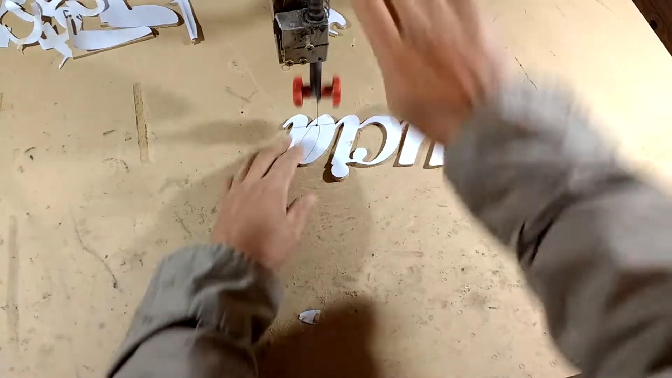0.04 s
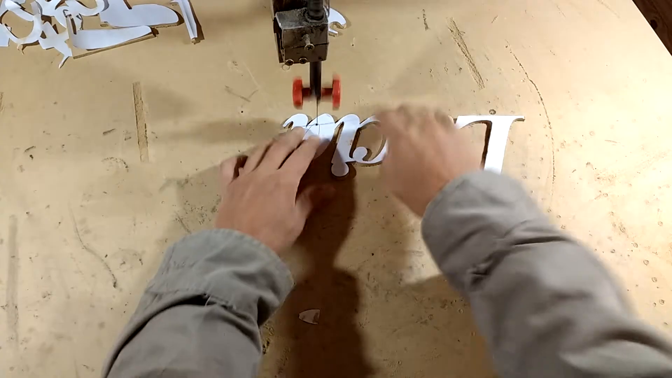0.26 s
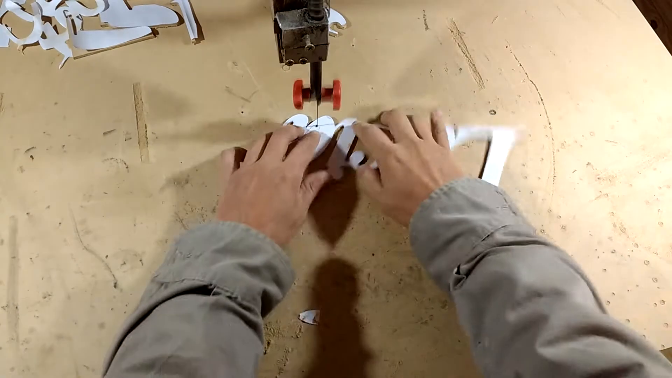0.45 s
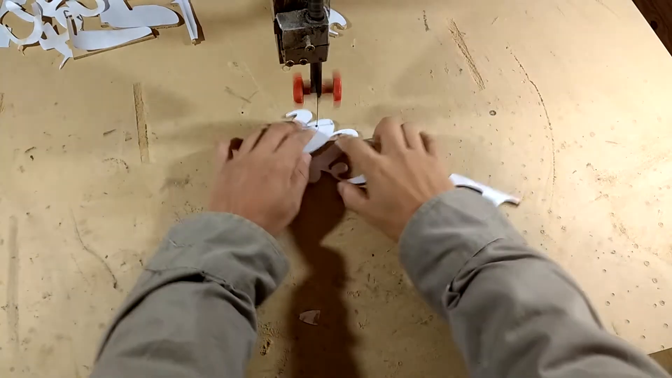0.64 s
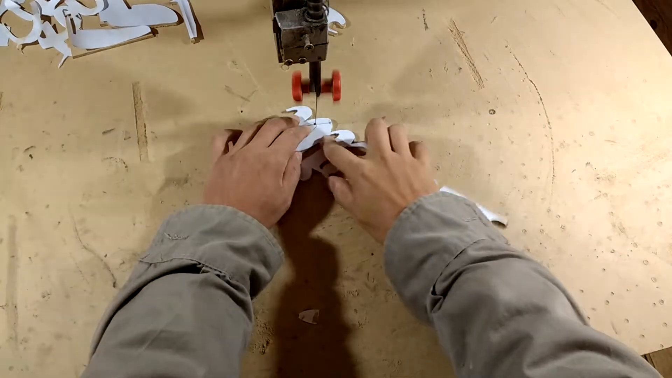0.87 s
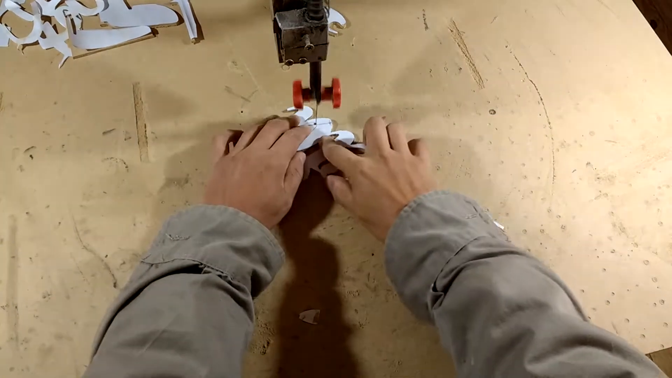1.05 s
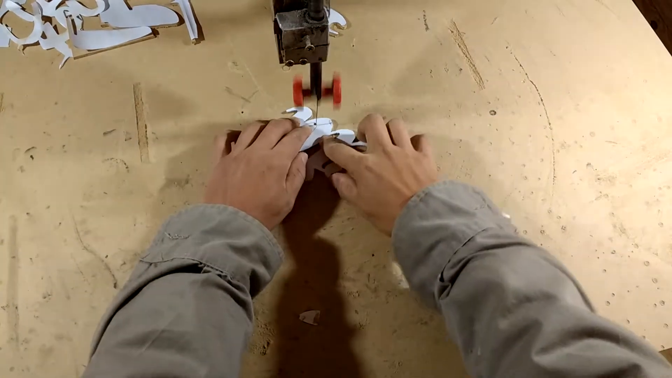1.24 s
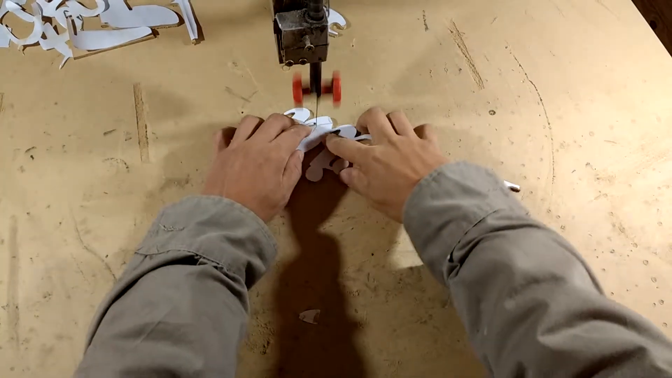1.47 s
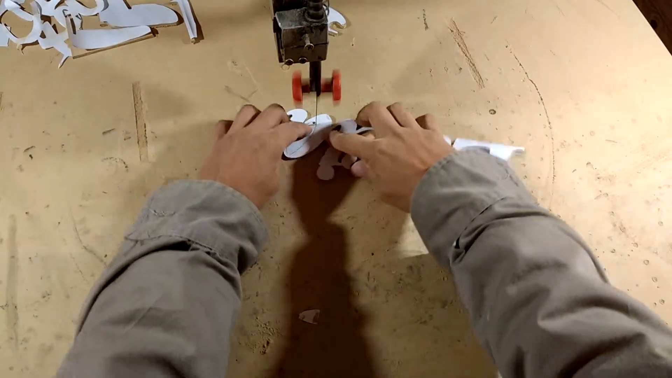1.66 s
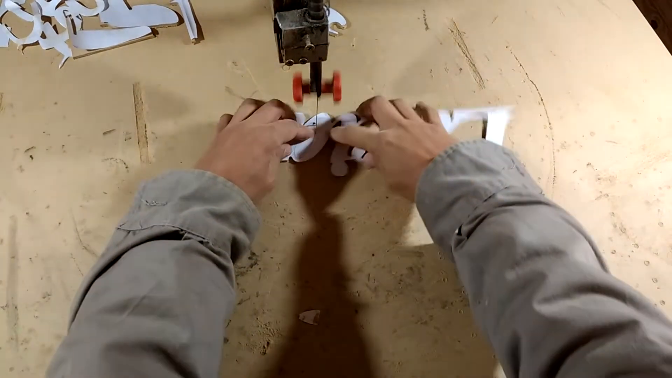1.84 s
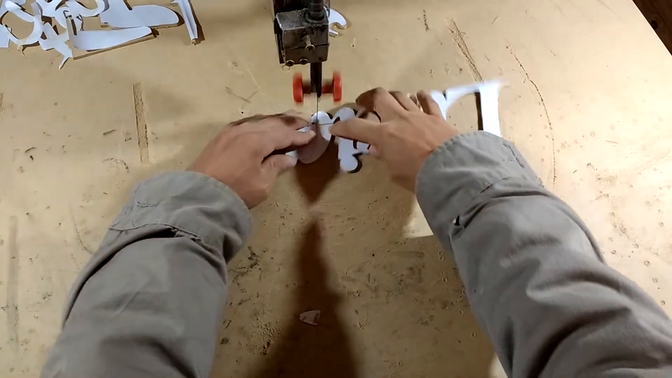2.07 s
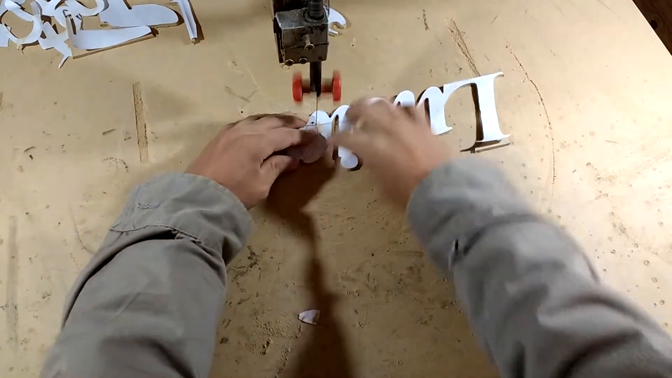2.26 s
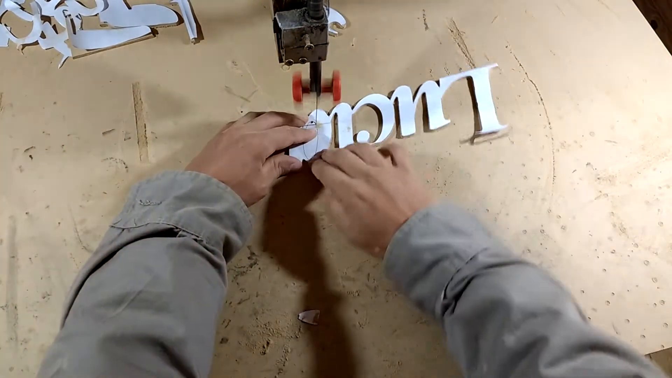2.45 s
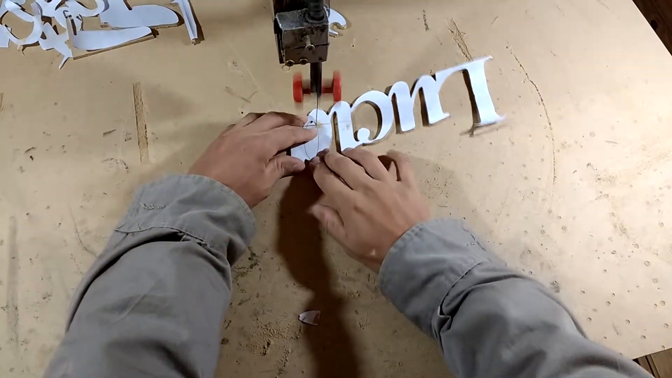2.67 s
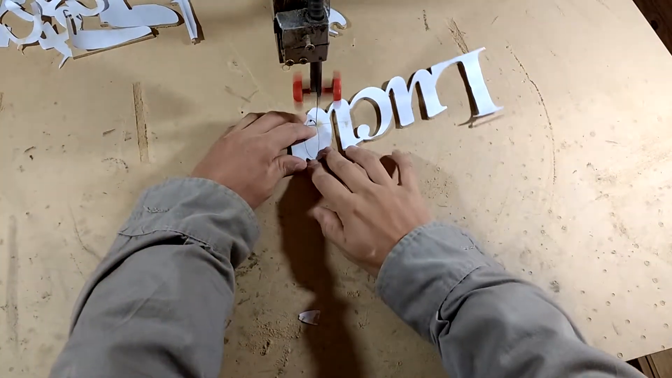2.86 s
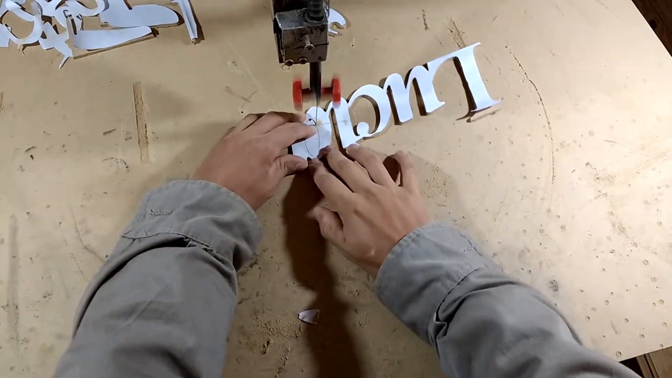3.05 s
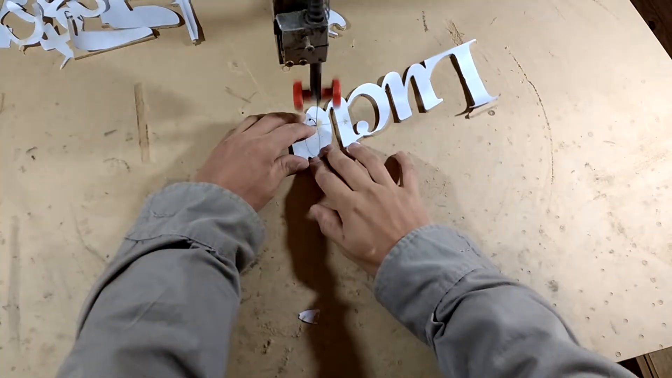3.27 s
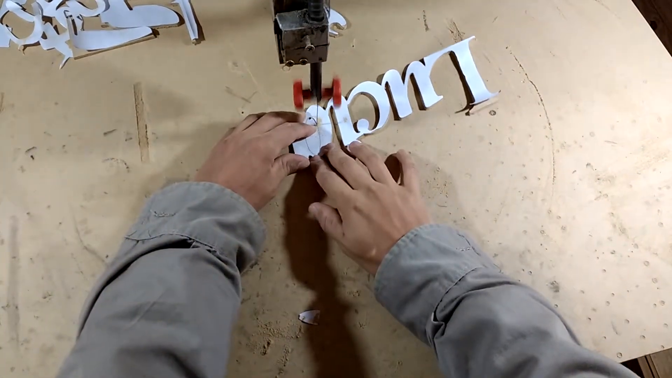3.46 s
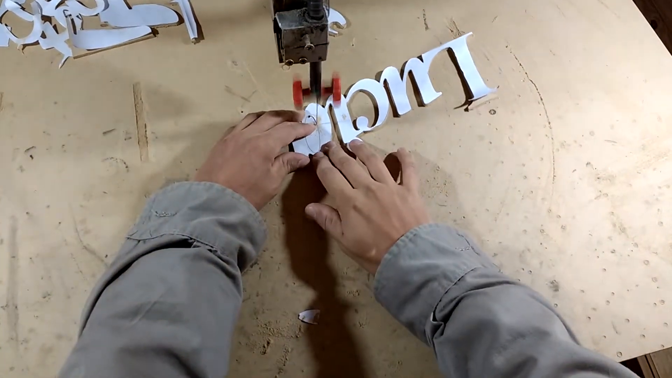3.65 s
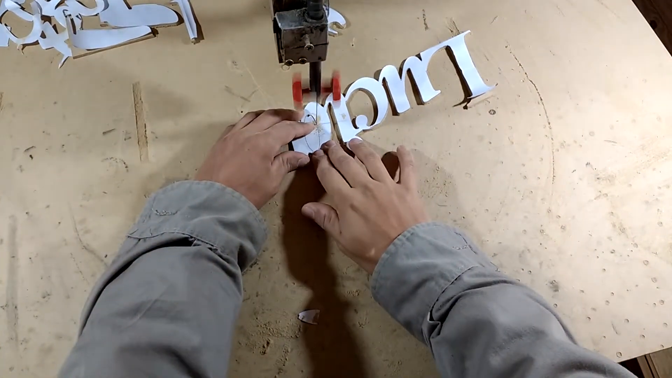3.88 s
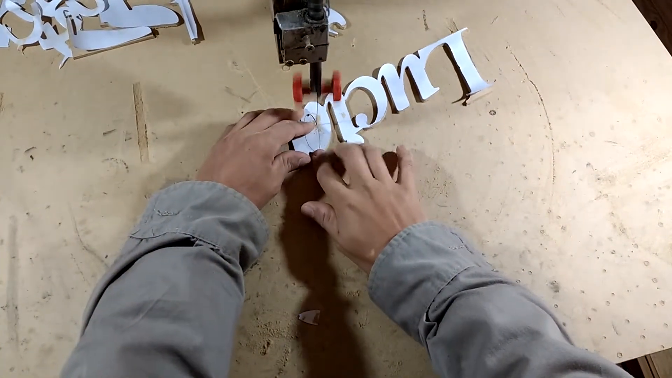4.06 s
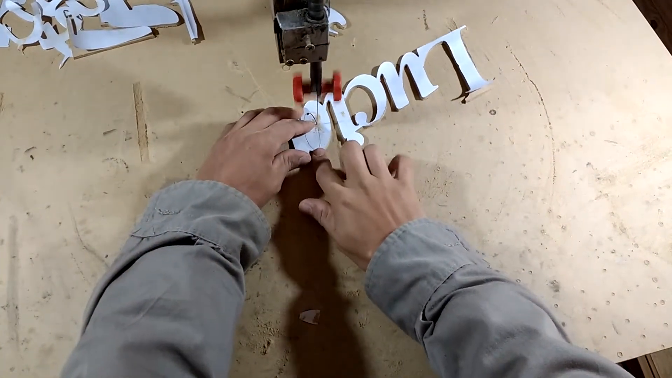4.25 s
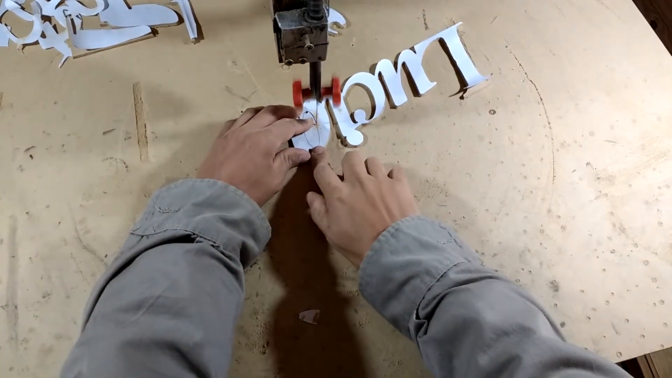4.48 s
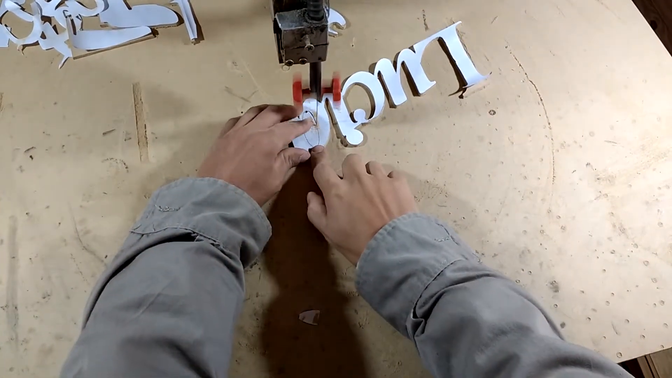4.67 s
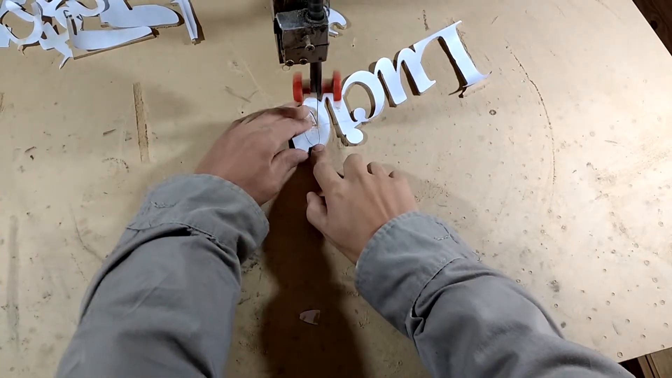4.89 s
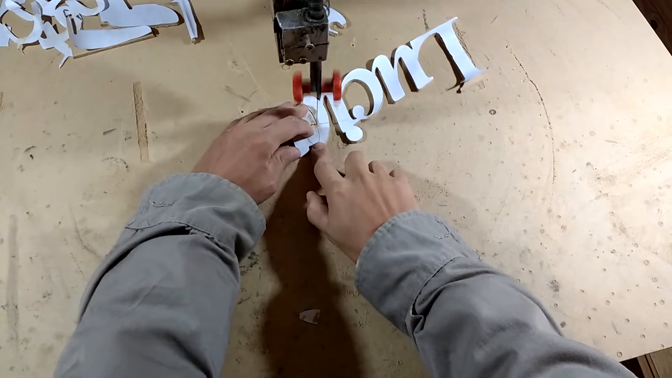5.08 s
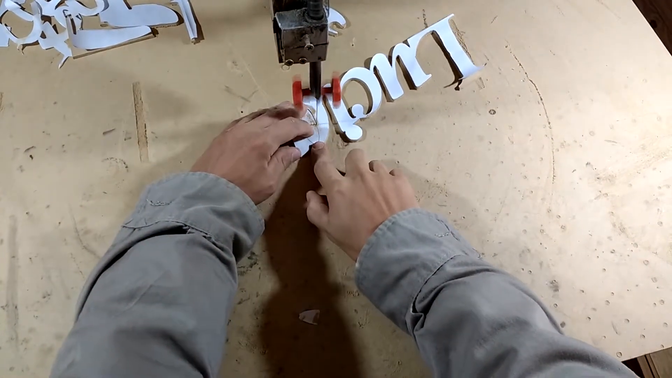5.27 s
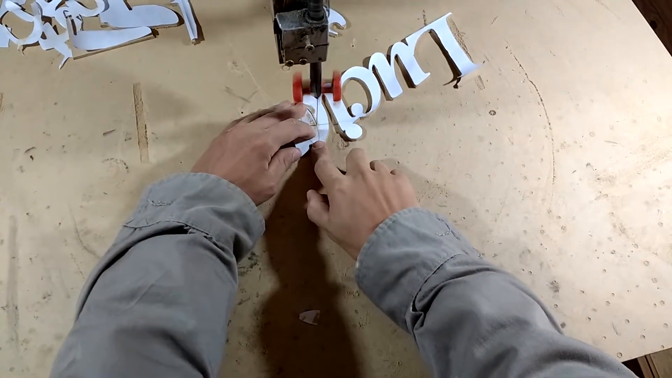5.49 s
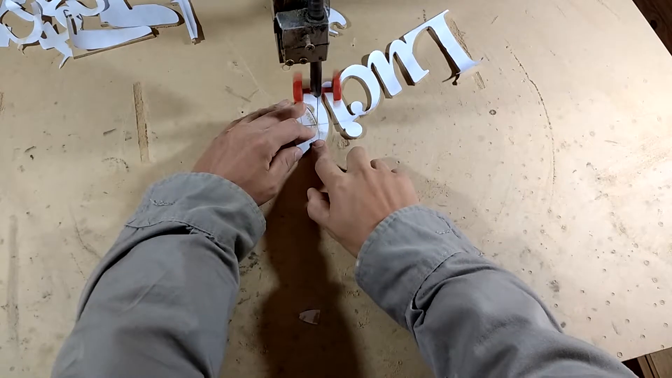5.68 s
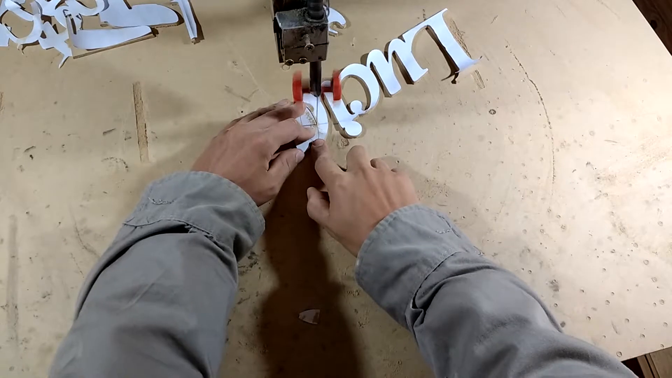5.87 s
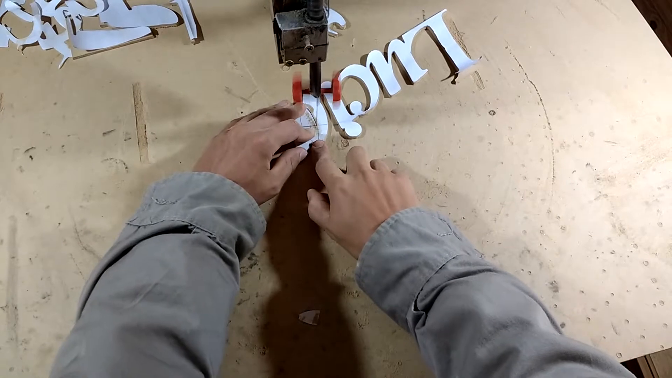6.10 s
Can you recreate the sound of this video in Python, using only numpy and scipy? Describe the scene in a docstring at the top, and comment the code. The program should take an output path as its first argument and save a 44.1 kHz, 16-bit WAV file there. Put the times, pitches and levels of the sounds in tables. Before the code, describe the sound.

A bench-mounted electric scroll saw starts quietly, with faint motor hum, loose knocks, light ticks of the workpiece and thin blade squeaks. Within a second it speeds up to a loud, rapid clatter of nearly fifteen strokes a second, then runs steadily. Metal arm ring, hollow table boom, low hum and loose rattle pulse together under a raspy cut. Heard close from above, in stereo, in a small dry workshop.

```python
"""An electric scroll saw on a workbench runs up to nearly 15 strokes a second and cuts a thin letter.
Every crank turn repeats knocks that ring the table, arm and link; the arm rings and the bench booms and hums.
Noise grains make the loose linkage rattle, the blade ring and the teeth rasp; motor and air lie beneath.
Two microphone ports hear it from above, each with its own phase and balance, in a small workshop."""
import sys
import numpy as np
from scipy import signal
from scipy.fft import rfft, irfft, next_fast_len
from scipy.io import wavfile
from scipy.ndimage import uniform_filter1d

SR = 44100
rng = np.random.default_rng(int(sys.argv[2]) if len(sys.argv) > 2 else 0)


def int16_out(signal):
    """Quantize to a 16-bit WAV file."""
    q = np.round(np.clip(np.atleast_2d(signal).T, -1, 1) * 32767)
    wavfile.write(sys.argv[1], SR, q.astype(np.int16))


N = 270333

# Levels in the tables are relative unless said otherwise.
# crank speed through the run-up and the cut: (time [s], rate [strokes/s])
SPEED = [(0, 8.03), (0.7, 11.73), (0.9, 13.94), (1.1, 13.77), (1.6, 14.56), (2.4, 14.94), (2.9, 14.57),
         (3.9, 14.46), (4.65, 14.26), (5.1, 14.63), (5.55, 14.62), (5.85, 14.84), (6.1, 14.39)]
# how hard the whole machine vibrates, rising in the run-up: (time [s], effort [dB], 0 = full)
EFFORT = [(0.0, -28.5), (0.25, -19), (.37, -16.5), (0.6, -8), (.7, -5.5), (.8, -1), (0.95, 0.5),
          (1.22, -0.1), (1.52, 0.1), (1.67, -2.5), (1.85, 1), (2.6, -0.4), (2.82, .5), (3.55, 0),
          (4.35, -0.5), (4.6, -4), (5.15, 1.5), (5.32, 0), (5.9, 2.5), (6.13, -0.5)]
# how firmly the hands feed the sheet: (time [s], bite [1 = ordinary feed])
FEED = [(0, 0.12), (.68, 0.26), (.74, 0.51), (.8, 0.54), (1.4, 0.66), (2.05, 0.7), (2.4, 0.88), (2.8, 1.08),
        (3.7, 0.97), (4.5, 1.53), (4.9, 0.97), (5.6, 1.08), (5.85, .45), (6.13, 0.27)]

# play taken up in one turn: (place [turns], push on table [dB], blow on arm [dB], clack in link [dB])
KNOCKS = [(.115, -12, -5, 1.5), (0.231, -8, -6.5, -10), (0.275, -3.5, -3, -11), (.372, -9, -4.5, -1.5),
          (.445, -4.5, -6.5, -11.5), (.635, -11, -2, -9), (.685, -20.5, -8.5, -2.5),
          (.88, -10.5, -12, -3.5)]
# modes of the saw table and bench: (frequency [Hz], width [Hz], level [dB])
TABLE = [(102, 46, -41), (171, 30, -31), (208, 8.2, 1), (234, 45, -6), (246.3, 9.2, -5.5),
         (292.6, 32, -2.5), (355.7, 16, -6.5)]
# modes of the arm and frame: (frequency [Hz], width [Hz], level [dB])
ARM = [(566.3, 20, 3), (593.3, 21, 3), (667, 8.4, 0), (730, 8.2, -6.5), (904.5, 9.2, -8.5)]
# modes of the connecting link: (frequency [Hz], width [Hz], level [dB])
LINK = [(437, 24, -8.5), (484, 31, 1), (1103, 24, -9.5), (1420, 23, -6)]
# the arm's clank and ring about what the effort gives: (time [s], level [dB])
CLANK = [(0, 4), (.5, 1.5), (.8, -3), (1.35, -2.5), (1.53, 2), (1.7, -1), (2.5, 1), (2.95, -0.5), (3.25, 1),
         (3.57, 4.5), (3.75, 0), (4.35, 0.5), (4.8, 3.5), (5, 0), (5.2, 1), (5.9, -1)]
# flexing of the arm, strongest on the downstroke: (place [turns], nominal pitch [Hz], level [dB])
FLEX = [(.01, 557, -21), (.14, 557, -5.5), (.21, 587, -6.5), (.3, 605.5, -1.5), (.39, 554, 0),
        (.48, 621.3, -7.5), (.57, 604, -12.5), (.68, 592, -6), (.79, 601, -13.5), (.93, 596, -15)]
# table boom, falling in pitch: (place [turns], nominal pitch [Hz], level [dB])
BOOM = [(.05, 365, -33), (.22, 346, -8.5), (.3, 309.4, -2), (.38, 268, -5), (.48, 215, 0.5),
        (.62, 208, -15), (.8, 207, -30)]
# jolts of the slack crank as it speeds up: (time [s], peak on table [dB], peak in arm [dB])
JOLTS = [(.205, -57, -46), (0.376, -40, -49), (.404, -45, -39), (.468, -38.5, -46), (.554, -37.5, -38),
         (.652, -46, -36.5), (.695, -45, -38), (.713, -34, -38)]
# how well the bench radiates the crank's shaking: (frequency [Hz], level [dB])
BENCH = [(140, -19), (160, -0.5), (168, 1.5), (180, -21), (202, 0.5), (213, 8.5), (222, -1), (232, -8),
         (248, -4), (275, -31), (330, -18), (364, -10), (385, -14)]
# swell of the bench's main hum, near 210 Hz at full speed: (time [s], level [dB])
HUM = [(0, -13), (.68, -10), (.73, 5.5), (1.0, -2.5), (1.15, -8.5), (1.45, 0), (2.5, -5), (2.85, 1),
       (3.7, -3.5), (3.95, 2.5), (4.15, -1.5), (4.45, -0.5), (5.1, -4), (5.7, -4), (6.0, 0)]

# tooth contact in one turn at depth 1: (place [turns], level [dB])
STROKE = [(.04, -12.5), (.13, -4.5), (.21, -2.5), (.28, -0.5), (.4, 0.04), (.5, -5.5), (.62, -6.5),
          (0.851, -8.5)]
# colour of the cut: (frequency [Hz], spectrum [dB per Hz])
RASP = [(300, -47), (1100, 0), (1550, 11.5), (1900, 14), (2400, 6.5), (2800, -0.5), (3300, -1), (4000, 0.5),
        (4800, 3), (6500, -3.5), (8500, -6), (11000, -7), (13000, -9), (15500, -10)]
# brightness of the cut, raising dust and lowering chips alike: (time [s], level [dB])
DUST = [(0, -0.5), (.68, -1), (.76, 2), (2.2, 0.7), (2.7, -1), (4.2, 0), (5.2, -0.5), (6.1, -0.5)]
# modes of the taut blade and its clamps, before the pitch bends: (frequency [Hz], width [Hz], level [dB])
BLADE = [(2124, 59, -1.5), (2252, 120, 4), (2474, 110, 2), (2713, 106, -1), (3008, 94, -3.5)]
# how freely the blade rings as the sheet is turned against it: (time [s], level [dB])
BLADE_RING = [(0, -2), (.7, 1), (1.0, 0.5), (2.5, -2), (3.0, -1), (3.7, -0.5), (3.95, 1), (4.6, -2),
              (5.18, -2.5), (5.35, -7), (5.9, -3.5)]
# when the free blade sings: (time [s], length [s], level [dB])
SINGS = [(0.197, 0.057, -71.5), (0.303, 0.055, -63), (0.378, 0.077, -66.5), (.49, 0.053, -71.5),
         (.625, 0.06, -61.5)]
# chatter of the joints, softest near the middle of the turn: (place [turns], level [dB])
CHATTER = [(.03, 0.5), (.14, 0), (.21, -1), (.35, -0.5), (.47, -4), (.565, -3), (.68, -0.5), (.8, -1.5),
           (.92, -0.5)]
# colour of the linkage rattle: (frequency [Hz], spectrum [dB per Hz])
RATTLE = [(25, -39), (60, -14), (110, -11), (170, -5.5), (300, 9), (400, 3), (520, 8), (700, 2),
          (850, -2.5), (1000, -4), (1110, 1.5), (1200, -4), (1400, 2), (1550, -4), (2000, -5),
          (2600, -10.5), (3500, -13.5), (6000, -34.5)]
# ticks of the work piece as it is set in place: (time [s], level [dB])
TICKS = [(0.277, -61), (.474, -60)]

# resonances that the running motor keeps sounding: (frequency [Hz], width [Hz], level [dB])
MOTOR = [(202.2, 7.8, 13), (607, 5.4, 5), (1105, 28, -1), (1430, 16, -8.5), (2560, 33, -12)]
# colour of the air through the motor: (frequency [Hz], spectrum [dB per Hz])
FAN = [(500, -19.5), (1100, 0.5), (1450, -7), (1800, 3), (2600, -0.5), (3500, 0), (4500, -2), (6500, -11.5),
       (15000, -24)]
# phase between the microphone ports: (frequency [Hz], lead of the right port [rad])
PORT_PHASE = [(0, 0), (100, 1), (160, 1.9), (215, .75), (300, 0), (420, .2), (460, .6), (600, -.1),
              (800, 0), (1400, 1), (1770, 3.14), (3580, 9.42), (10650, 34.56), (16000, 53.5)]
# level between the microphone ports: (frequency [Hz], left minus right [dB])
PORT_BALANCE = [(100, 3), (160, 0.5), (215, -0.5), (290, -1.5), (400, 12), (500, 1.5), (600, 0), (700, 6.5),
                (1000, -1), (1420, -1.5), (1700, 0), (3000, 0), (15000, 0.6)]

# base levels at full effort and ordinary feed, before each part's own trim (dB)
TABLE_DB, ARM_DB, LINK_DB, RATTLE_DB, BLADE_DB = -39, -38.5, -48.5, -45.5, -49
HUM_DB, THUMP_DB = -41.5, -67
# dB of level for each dB of effort
TABLE_FOLLOWS, ARM_FOLLOWS, LINK_FOLLOWS, RATTLE_FOLLOWS, BLADE_FOLLOWS = 0.74, 1.24, 0.79, 0.88, 0.83
# dB for each doubling of the bite: firm feeding loads the table, stills the joints, makes the teeth louder
TABLE_LOAD_DB, RATTLE_LOAD_DB, BLADE_LOAD_DB, HUM_LOAD_DB = 2.8, -1.5, 3, 0.2
# spread of strength from stroke to stroke (dB)
TABLE_SPREAD_DB, ARM_SPREAD_DB, RATTLE_SPREAD_DB, BLADE_SPREAD_DB = 0.4, 0.5, 1.5, 1.8
# stroke-to-stroke spread of the contact's moment (turns), its depth (dB) and the cut's brightness (dB)
CONTACT_SPREAD, DEPTH_SPREAD_DB, BRIGHT_SPREAD_DB = .012, 1.0, 1.0
# rate of tooth snags, their power decay (s) and their share of the rasp's power
SNAGS_PER_S, SNAG_DECAY_S, SNAG_SHARE = 110, .004, .46
SING_HZ = 2486  # mean pitch of the free blade
TOP_HZ = 15600  # upper edge of the recorder

TIME = np.arange(N) / SR
SIZE = next_fast_len(N + SR // 2)  # leaves room for filter tails
FREQ = np.arange(SIZE // 2 + 1) * SR / SIZE + 1e-3  # the offset avoids dividing by zero


def frame(turn, table_db, arm_db, link_db):
    """The crank's knocks drum on the table, clank in the arm and clack in the connecting link."""
    _, push_db, blow_db, clack_db = np.transpose(KNOCKS)
    pushes = knocks(turn, push_db, jitter_s=0.0006, scatter_db=2.5)
    blows = knocks(turn, blow_db, jitter_s=0.00028, scatter_db=1.0)
    clacks = knocks(turn, clack_db, jitter_s=0.00022, scatter_db=2.0)
    table = ring(pushes, TABLE, low_hz=168, high_hz=370, order=6)
    arm = ring(blows, ARM, low_hz=430, high_hz=950)
    link = ring(clacks, LINK, low_hz=385, high_hz=1630)
    return table * undb(table_db - 5.0) + arm * undb(arm_db - 9.0) + link * undb(link_db)


def arm_ring(turn, arm_db, ring_db=-5.0):
    """Each stroke flexes the arm, whose main mode swells into a firm, nearly pure ring."""
    return stroke_tone(turn, FLEX, crest=.3, drift=.028) * undb(arm_db + ring_db)


def table_boom(turn, table_db, boom_db=-8.0, spread_db=1.2):
    """Each downstroke drives the sheet onto the table, which answers with a short, falling boom."""
    level_db = table_db + boom_db + spread_db * wander(turn)
    return stroke_tone(turn, BOOM, crest=.3, drift=.025) * undb(level_db)


def jolts():
    """Single knocks of the run-up ring the table and arm modes."""
    s, *levels = np.transpose(JOLTS)
    at = (s * SR).astype(int)
    out = 0
    for db, modes, top_hz in zip(levels, (TABLE, ARM), (260, 1300)):
        rung = ring(np.bincount(at, undb(db), N), modes, low_hz=164, high_hz=top_hz)
        out = out + rung / np.abs(rung).max() * undb(db.max())
    return out


def shake(turn, speed, hum_db, swell_db, reversal=.89, dispersion=0.03045, waver_db=2.5, throb=0.53):
    """The swinging arm shakes the bench at multiples of the stroke rate; those near a resonance hum."""
    hz, db = np.transpose(BENCH)
    since_reversal = turn - reversal
    out = 0
    for k in (11, 14, 15, 17, 25):
        gain = undb(np.interp(k * speed, hz, db) + waver_db * wander(turn))
        if k in (14, 15):
            gain = gain * undb(swell_db)
        # bending waves travel at different speeds, which smears each jolt
        lag = dispersion * (k - 15) ** 2
        out = out + gain * np.cos(2 * np.pi * (k * since_reversal - lag))
    # the hum throbs once a turn, strongest as the arm swings back
    swell = 1 + throb * np.cos(2 * np.pi * since_reversal)
    return unit(out * swell) * undb(hum_db)


def thump(turn, effort_db, place=0.848, length=0.11, thump_hz=101):
    """The arm turns round once a stroke and gives the bench a soft, low thud."""
    since = (turn - place + .5) % 1 - .5  # turns from the thud's centre
    since_s = since / (np.gradient(turn) * SR)
    thud = np.exp(-.5 * (since / length) ** 2) * np.cos(2 * np.pi * thump_hz * since_s)
    return unit(thud) * undb(THUMP_DB + effort_db + 1.3 * wander(turn))


def rasp(turn, blade_db, bite, split_hz=5500):
    """Teeth tear coarse chips and fine dust from the sheet, in a different mix on each downstroke."""
    chips = grains(per_second=6000, spread_db=2.0) * contact(turn, 1.0 * bite)
    dust = grains(per_second=12000, spread_db=1.0) * contact(turn, 1.22 * bite)
    bright = undb(curves(DUST)[0] + BRIGHT_SPREAD_DB * wander(turn))
    coarse = 1 / (1 + (FREQ / split_hz) ** 4)  # the chips' share of the power
    low_cut = filtered(chips / bright, colour(RASP) * np.sqrt(coarse))
    high_cut = filtered(dust * bright, colour(RASP) * np.sqrt(1 - coarse))
    return unit((low_cut + high_cut) * snags()) * undb(blade_db + 0.2)


def contact(turn, bite):
    """The swell of each downstroke: deeper with more bite, at the same mean power; no two catch alike."""
    depth = bite * undb(DEPTH_SPREAD_DB * wander(turn))
    moment = turn + CONTACT_SPREAD * wander(2 * turn)
    gain = each_turn(moment, STROKE) ** depth
    return gain / np.sqrt(uniform_filter1d(gain ** 2, int(2 * N / turn[-1])))


def snags():
    """Gain of a ragged cut: each snag starts at once and dies away over the steady scraping."""
    catches = (rng.random(N) < SNAGS_PER_S / SR) * (.5 + rng.random(N))
    power = signal.lfilter([1], [1, -np.exp(-1 / (SNAG_DECAY_S * SR))], catches)
    return np.sqrt(1 - SNAG_SHARE + SNAG_SHARE * power / power.mean())


def blade(turn, speed, blade_db, bite, bend=0.0483, tightest=0.336):
    """The scraped blade rings; its pitch arches as the tension rises and falls in each stroke."""
    pull = grains(per_second=5000, spread_db=-2.0) * contact(turn, 1.73 * bite)
    ringing = ring(pull, BLADE, low_hz=1730, high_hz=2960)
    # reading ahead and behind in time (s) bends the pitch by a fraction
    ahead = bend * np.sin(2 * np.pi * (turn - tightest)) / (2 * np.pi * speed)
    return np.interp(TIME + ahead, TIME, ringing) * undb(blade_db - 1.4)


def free_blade(fade_s=.012, waver=0.01):
    """Barely touching the sheet in the run-up, the blade is rubbed into brief, thin, wavering rings."""
    swell = 0
    for s, length, db in SINGS:
        fade = np.clip(np.minimum(TIME - s, s + length - TIME) / fade_s, 0, 1)
        swell = swell + undb(db) * fade
    hz = SING_HZ * (1 + waver * unit(uniform_filter1d(rng.standard_normal(N), size=120)))
    return unit(np.sin(2 * np.pi * np.cumsum(hz) / SR)) * swell


def linkage(turn, rattle_db):
    """Tiny impacts in the loose joints chatter through the turn, softest near its middle."""
    chatter = grains(per_second=1100, spread_db=3.0) * each_turn(turn, CHATTER)
    return unit(filtered(chatter, colour(RATTLE))) * undb(rattle_db - 0.4)


def work_piece(decay_s=0.0047):
    """Short dry ticks of the light sheet against the table: decaying bursts of coloured noise."""
    swell = 0
    for s, db in TICKS:
        swell = swell + undb(db) * (TIME >= s) * np.exp(-np.abs(TIME - s) / decay_s)
    tap_colour = colour([(500, -12), (4000, 17), (15000, -11)])
    return swell * unit(filtered(rng.standard_normal(N), tap_colour))


def motor(motor_db=-51.5, start_db=-5, rise_s=0.38):
    """The motor's fine vibration sings softly in the casting, steady after a short rise."""
    rise_db = start_db * np.clip(1 - TIME / rise_s, 0, 1)
    singing = ring(rng.standard_normal(N), MOTOR, low_hz=164, high_hz=2730)
    return singing * undb(motor_db + rise_db)


def fan(effort_db, fan_db=-60, follows=0.59):
    """Air hisses through the motor, louder as the machine's effort rises."""
    return unit(filtered(rng.standard_normal(N), colour(FAN))) * undb(fan_db + follows * effort_db)


def ports(x):
    """The direct sound reaches the two ports with its own lag and balance at each frequency."""
    lead = np.exp(.5j * np.interp(FREQ, *np.transpose(PORT_PHASE)))  # half the phase to each port
    left = np.sqrt(colour(PORT_BALANCE))
    return filtered(x, np.array([left / lead, lead / left]))


def workshop(x, t60_s, wet_db):
    """Near walls return a short diffuse tail, different at each port."""
    t = TIME[:SR // 2]
    tails = rng.standard_normal((2, len(t))) * undb(-60 * t / t60_s) * (t > .002)
    tails /= np.linalg.norm(tails, axis=1, keepdims=True)
    walls = colour([(200, -13), (600, -14), (1400, -8), (3000, -4), (6000, -3), (12000, -1)])
    return undb(wet_db) * filtered(x, rfft(tails, SIZE) * walls)


def knocks(turn, knock_db, jitter_s, scatter_db):
    """One impulse for each knock of each turn, never quite at the same place or strength."""
    places = np.arange(int(turn[-1]) + 1)[:, None] + np.array(KNOCKS)[:, 0]
    late, strong = rng.standard_normal((2,) + places.shape)
    at = (np.interp(places, turn, TIME) + jitter_s * late) * SR
    size = undb(knock_db + scatter_db * strong)
    inside = (places < turn[-1]) & (at >= 0) & (at < N)
    return np.bincount(at[inside].astype(int), size[inside], N)


def ring(blows, modes, low_hz, high_hz, order=4):
    """Blows ring a set of modes, each to its own level; the part radiates only between two edges."""
    low_edge = 1 + (low_hz / FREQ) ** (2 * order)
    high_edge = 1 + (FREQ / high_hz) ** (2 * order)
    push = rfft(blows, SIZE) / np.sqrt(low_edge * high_edge)
    out = 0
    for hz, width, db in modes:
        mode = push / (1 + 1j * (FREQ / hz - hz / FREQ) * hz / width)
        out = out + undb(db) * mode / np.linalg.norm(mode)
    return unit(irfft(out, SIZE)[:N])


def stroke_tone(turn, shape, crest, drift):
    """A tone restarts each turn on a (place, Hz, dB) shape, a little off pitch; phase is zero at the crest."""
    place, hz, db = np.transpose(shape)
    pitch = np.interp(turn, place, hz, period=1) * (1 + drift * wander(turn))
    cycles = np.cumsum(pitch) / SR
    cycles = cycles - np.interp(np.floor(turn) + crest, turn, cycles)
    return unit(np.sin(2 * np.pi * cycles) * each_turn(turn, np.c_[place, db]))


def grains(per_second, spread_db):
    """Dense tiny impacts of uneven size and either sign."""
    count = int(per_second * N / SR)
    place, size, spread = rng.random((count, 3)).T
    strength = (size - .5) * undb(spread_db * np.pi * (spread - .5))
    return unit(np.bincount((place * N).astype(int), strength, N))


def each_turn(turn, shape):
    """Gain that follows a (place in the turn, dB) shape round every turn."""
    return undb(np.interp(turn, *np.transpose(shape), period=1))


def wander(turn):
    """A new random value each turn, joined by straight lines."""
    return np.interp(turn, np.arange(200), rng.standard_normal(200))


def curves(table):
    """Each column of a time table, sample by sample."""
    s, *columns = np.transpose(table)
    return [np.interp(TIME, s, c) for c in columns]


def colour(points):
    """Gain at every frequency from (Hz, dB) points."""
    hz, db = np.transpose(points)
    return undb(np.interp(np.log(FREQ), np.log(hz), db))


def filtered(x, response):
    """Pass a sound through a frequency response."""
    return irfft(rfft(x, SIZE) * response, SIZE)[..., :N]


def undb(db):
    """Decibels to gain."""
    return 10 ** (np.asarray(db) / 20)


def unit(x):
    """Scale to rms 1."""
    return x / np.sqrt(np.mean(x ** 2))


def scene():
    """One crank paces the saw's strokes; effort and the feed of the sheet set the levels of its parts."""
    (speed,), (effort_db,), (bite,) = curves(SPEED), curves(EFFORT), curves(FEED)
    (clank_db,), (swell_db,), (free_db,) = curves(CLANK), curves(HUM), curves(BLADE_RING)
    turn = np.cumsum(speed) / SR
    load = np.log2(np.maximum(bite, .05))  # doublings of the bite

    table_db = TABLE_DB + TABLE_FOLLOWS * effort_db + TABLE_LOAD_DB * load
    table_db = table_db + TABLE_SPREAD_DB * wander(turn)
    arm_db = ARM_DB + ARM_FOLLOWS * effort_db + clank_db + ARM_SPREAD_DB * wander(turn)
    link_db = LINK_DB + LINK_FOLLOWS * effort_db
    rattle_db = RATTLE_DB + RATTLE_FOLLOWS * effort_db + RATTLE_LOAD_DB * load
    rattle_db = rattle_db + RATTLE_SPREAD_DB * wander(turn)
    blade_db = BLADE_DB + BLADE_FOLLOWS * effort_db + BLADE_LOAD_DB * load
    blade_db = blade_db + BLADE_SPREAD_DB * wander(turn)
    hum_db = HUM_DB + TABLE_FOLLOWS * effort_db + HUM_LOAD_DB * load

    body = frame(turn, table_db, arm_db, link_db) + arm_ring(turn, arm_db) + table_boom(turn, table_db)
    body = body + jolts() + shake(turn, speed, hum_db, swell_db) + thump(turn, effort_db)
    cut = rasp(turn, blade_db, bite) + blade(turn, speed, blade_db + free_db, bite) + free_blade()
    saw = body + cut + linkage(turn, rattle_db) + work_piece() + motor() + fan(effort_db)

    # chatter and chips from all round the machine reach each port differently
    scattered = []
    for _ in range(2):
        around = undb(-5.0) * linkage(turn, rattle_db) + undb(-17) * rasp(turn, blade_db, bite)
        scattered.append(around)
    return ports(saw) + np.array(scattered) + workshop(saw, t60_s=0.07, wet_db=-5.5)


def record(dry):
    """The recorder cuts the top steeply."""
    return signal.sosfilt(signal.ellip(10, .2, 70, TOP_HZ, fs=SR, output="sos"), dry)


dry = scene()
out = record(dry)
int16_out(out)
```